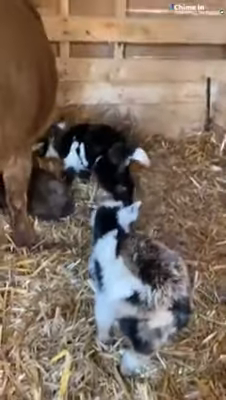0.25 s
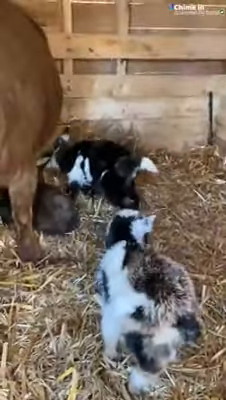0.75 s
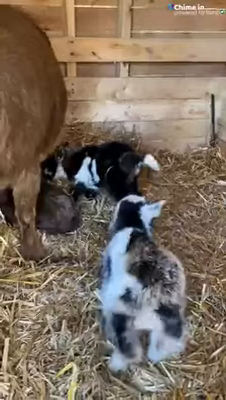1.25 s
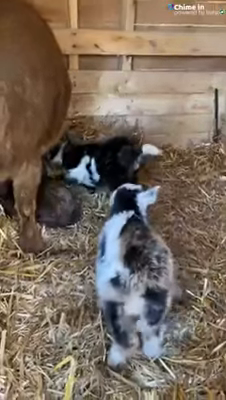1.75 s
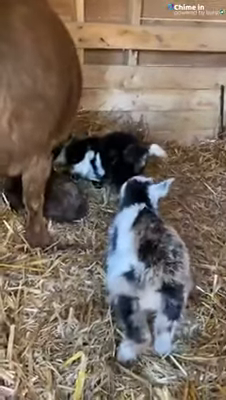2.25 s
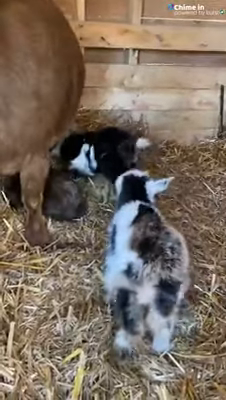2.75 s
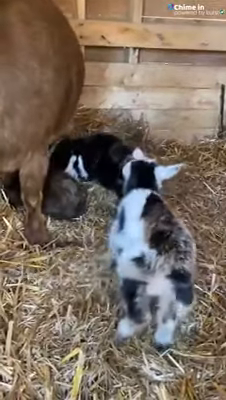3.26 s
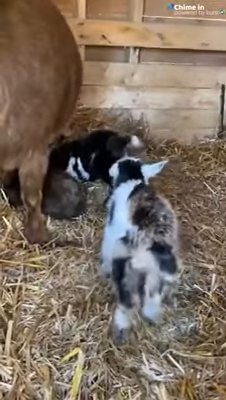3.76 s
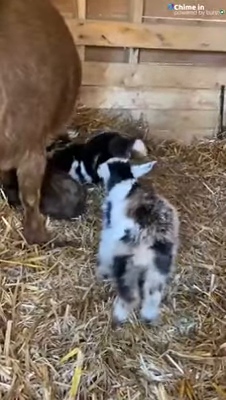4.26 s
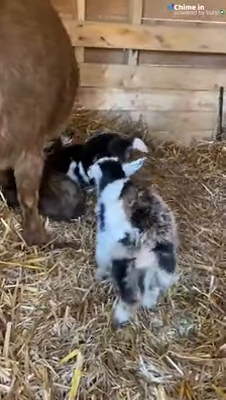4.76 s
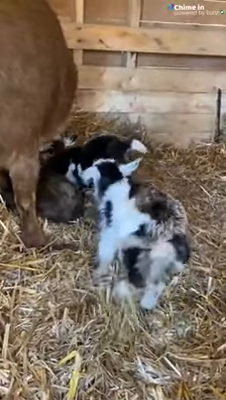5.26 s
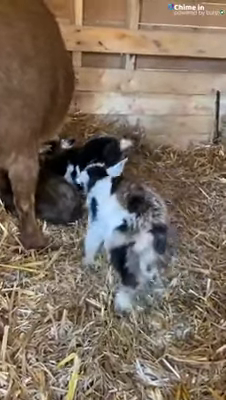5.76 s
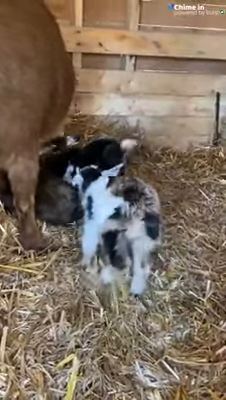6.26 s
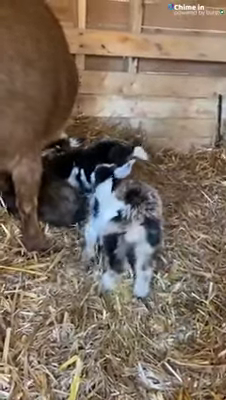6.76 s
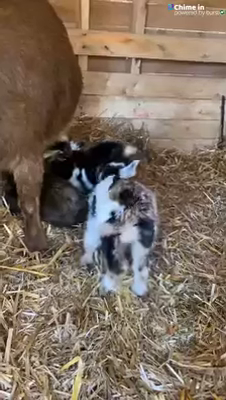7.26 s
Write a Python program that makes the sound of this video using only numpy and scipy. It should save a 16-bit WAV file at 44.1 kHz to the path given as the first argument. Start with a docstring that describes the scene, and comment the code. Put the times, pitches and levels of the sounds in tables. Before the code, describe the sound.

A young goat bleats six times, close by, in a small wooden pen. The first cry is loudest and longest, sagging into a rasp and followed by airy nose puffs; five shorter, quieter, quavering bleats follow about every second. Straw rustles and snaps as the animals shift, with a couple of dull low thumps. A low motor hum runs steadily underneath. Close stereo pickup, short dry plank reflections.

```python
"""Goat kid bleating in a straw pen

A goat kid bleats six times in a straw-bedded wooden pen, over a low machine hum built from sine partials.
Each bleat is a stack of harmonics and breath shaped by throat resonances: it scoops up in pitch, quavers
and frays into a rasp, and one sharp resonance makes it shrill. Noise swells make a goat's nose puffs, hoof
falls, low thumps and the bleats' last sighs; hiss, random cracks and bright bursts make the moving straw."""
import sys
import numpy as np
from scipy import signal
from scipy.io import wavfile

SR = 44100
rng = np.random.default_rng(int(sys.argv[2]) if len(sys.argv) > 2 else 0)


def wav_out(sig):
    """Save sig, one row per channel (or a flat mono array), as 16-bit PCM at SR to the path in sys.argv[1]."""
    wavfile.write(sys.argv[1], SR, np.round(np.clip(np.atleast_2d(sig).T, -1, 1) * 32767).astype(np.int16))


N = 330750

# The bleats. Each row: start in seconds, end in seconds, held pitch in Hz, scoop depth (0-1), scoop time in
# seconds, pitch sag by the end (0-1), level in dB before the voice trim, attack in seconds, fade by the end
# in dB, relative treble in dB, onset roughness (0-1), held roughness (0-1), throat tuning factor,
# first harmonic in dB, second harmonic in dB, fourth harmonic and up in dB.
BLEAT_ROWS = [(.6, 1.303, 831, .28, 0.048, 0.29, -16.5, 0.049, 16.5, -8.5, 0.65, 0, 1.037, -3, -3, -4),
              (2.463, 2.802, 745.7, 0.35, 0.05, 0.05, -20.5, 0.057, 3.5, -10.5, 0.02, 0.4, 1.037, -0.5, -2.5, -2.5),
              (3.813, 4.265, 812, 0.23, 0.039, .068, -25.5, 0.028, 1, -8, 0.14, 0, 1.095, 4, -4, -2),
              (5.033, 5.39, 783.8, 0.26, 0.043, .045, -21.5, 0.03, 6.7, -7.5, 0.63, 0.14, 1.085, -3.5, -14.5, -7.5),
              (6.113, 6.533, 797.5, .35, .045, 0.08, -21.5, 0.051, 3, -6, 0.86, 0.1, 1.019, 3, -4, -1.5),
              (7.053, 7.366, 765, 0.23, 0.032, 0.04, -25, 0.03, -6.5, -10, 0.25, 0.06, 1, -2, -6, -2.5)]
# Resonances of the open mouth that colour breath. Each row: centre in Hz, width in Hz, relative level in dB.
MOUTH_RESONANCES = [(2364, 170, 6.5), (3115, 850, 1), (3600, 390, 2.5), (5470, 1800, -10)]
MURMUR_S = .022  # faint lead-in from the closed mouth, ahead of each bleat


def from_db(db):
    """Decibels to gain."""
    return 10 ** (np.asarray(db) / 20)


def rms_one(x):
    """Scale to unit rms."""
    return x / np.sqrt(np.mean(x ** 2) + 1e-20)


def at_hz(points, hz):
    """Read a curve of (Hz, value) points on a log-frequency axis."""
    points = np.array(points)
    return np.interp(np.log(hz), np.log(points[:, 0]), points[:, 1])


def bell(offset_s, half_s):
    """A smooth hump of height 1 around zero."""
    return np.exp(-(offset_s / half_s) ** 2)


def band(x, low_hz, high_hz):
    """Butterworth band-pass."""
    sos = signal.butter(2, [low_hz, min(high_hz, .45 * SR)], "band", fs=SR, output="sos")
    return signal.sosfilt(sos, x)


def drift(rate_hz, size):
    """Smooth random wander of rms about 1: low-passed noise made at a sixteenth of the sample rate."""
    pole = np.exp(-32 * np.pi * rate_hz / SR)
    noise = rng.standard_normal(size // 16 + 4002)
    slow = signal.lfilter([1], [1, -2 * pole, pole * pole], noise)[4000:]  # drop the filter's settling
    return np.interp(np.arange(size) / 16, np.arange(len(slow)), rms_one(slow))


def resonance_gain(modes, hz):
    """Gain of a set of steep-sided resonances at a frequency."""
    gains = [from_db(db) / (1 + (2 * (hz - centre) / width) ** 2) for centre, width, db in modes]
    return np.sqrt(sum(gain ** 2 for gain in gains))


def through(modes, x):
    """Pass a sound twice through each resonance and sum them; rms 1."""
    out = 0
    for centre, width, db in modes:
        b, a = signal.iirpeak(centre, centre / width, fs=SR)
        once = signal.lfilter(b, a, x)
        out = out + from_db(db) * signal.lfilter(b, a, once)
    return rms_one(out)


def banded_noise(spectrum):
    """Stereo noise in 18 bands that follow a spectrum, more alike left and right in the bass; rms 1."""
    # Left-right likeness of diffuse sound. Each row: frequency in Hz, likeness (0-1).
    likeness = [(150, 1), (300, 0.86), (1000, 0.64), (3000, 0.6), (10000, 0.2)]
    edges = np.geomspace(max(spectrum[0][0], 18), spectrum[-1][0], num=19)
    white = rng.standard_normal((2, 2, N))
    out = 0
    for k, (low, high) in enumerate(zip(edges, edges[1:])):
        mid, side = band(white[k % 2], low, high)
        hz = np.sqrt(low * high)
        alike = np.clip(at_hz(likeness, hz), 0, .996)
        stereo = np.sqrt(1 + alike) * mid + np.sqrt(1 - alike) * side * [[1], [-1]]
        out = out + from_db(at_hz(spectrum, hz)) * stereo
    return rms_one(out)


def swells(rows):
    """Envelope of events that rise smoothly and then die away, falling 60 dB in each t60."""
    t = np.arange(N) / SR
    total = 0
    for start, db, rise, t60 in rows:
        decay = from_db(db - 60 * np.maximum(t - start, 0) / t60)
        total = total + decay * bell(np.minimum(t - start, 0), rise)
    return total


def hum():
    """Each turn of a motor gives a soft throb: multiples of its rate, nearly in step, wavering in strength."""
    # Hum partials. Each row: multiple of the turning rate, level in dB before the hum trim.
    hum_partials = [(1, -72), (2, -59), (3, -62), (4, -57), (5, -51), (6, -62), (7, -63), (9, -73),
                    (12, -72.5)]
    motor_hz, trim_db, waver = 24.21, -.5, .22
    turns = motor_hz * np.arange(N) / SR + rng.random()
    total = 0
    for multiple, db in hum_partials:
        strength = from_db(db) * (1 + waver * drift(8, N))
        phase = 2 * np.pi * round(multiple) * turns + .5 * rng.standard_normal()
        total = total + strength * np.sin(phase)
    return from_db(trim_db) * np.sqrt(2) * total


def barn_air():
    """The air of the barn: a steady bed of bass-heavy diffuse noise."""
    # Colour of the air. Each row: frequency in Hz, relative level in dB.
    air_colour = [(25, -36), (45, -5), (68, 2), (100, -7.5), (135, -4.5), (175, -10), (210, -20),
                  (330, -16.5), (500, -21.5), (800, -26), (1150, -33.5), (1700, -26.5), (3000, -32),
                  (5000, -51.5)]
    return from_db(-51.5) * banded_noise(air_colour)


def shuffling():
    """Strength of the rustle: each shuffle swells, holds and stops over the resting straw."""
    # Animals shuffle in the bedding. Each row: middle in seconds, half length in seconds, level in dB.
    shuffle_rows = [(0.113, 0.13, -63.5), (0.534, 0.034, -54.5), (1.42, 0.22, -57.5), (2.027, 0.043, -61),
                    (3.02, 0.28, -53.5), (3.67, 0.36, -58), (4.96, 0.2, -62.5), (5.411, 0.056, -55),
                    (5.706, 0.047, -60), (6.005, 0.22, -55.5), (6.91, 0.12, -58)]
    edge_steepness, resting_db = 7.5, -66  # resting: the rustle that never quite dies
    t = np.arange(N) / SR
    power = from_db(resting_db) ** 2
    for middle, half_s, db in shuffle_rows:
        power = power + from_db(db) ** 2 * np.exp(-np.abs((t - middle) / half_s) ** edge_steepness)
    return np.sqrt(power)


def straw():
    """Stalks rub in a soft hiss with tiny cracks scattered through it."""
    # Colour of the rustle. Each row: frequency in Hz, relative level in dB.
    straw_colour = [(1000, -6.5), (1600, -2.5), (2700, -1), (5000, -2), (7500, -3.5), (12000, -4),
                    (15000, -11.5)]
    crackle_db, cracks_per_s = -10, 250  # level against the hiss; rate on each side
    struck = rng.random((2, N)) < cracks_per_s / SR
    cracks = struck * from_db(4 * np.minimum(rng.exponential(1, (2, N)), 4))
    cracks = cracks + .5 * cracks[::-1]  # each side leaks into the other
    cracks = rms_one(band(cracks, 2800, 17000))
    return shuffling() * (banded_noise(straw_colour) + from_db(crackle_db) * cracks)


def snaps():
    """Straw snapping under hooves: a breaking stalk gives a brief bright burst."""
    # Snaps. Each row: time in seconds, level in dB before the snap trim.
    snap_rows = [(0.5013, -47), (2.995, -40), (3.4865, -48), (4.6604, -48.5), (5.487, -47), (5.848, -38),
                 (7.456, -49)]
    trim_db, rise_s, t60_s = -7.5, .0026, .073
    bursts = swells([(start, db, rise_s, t60_s) for start, db in snap_rows])
    return from_db(trim_db) * bursts * rms_one(band(rng.standard_normal(N), 1300, 14400))


def effort(t, start, end, held_hz, scoop_depth, scoop_s, sag, held_db, attack_s, fade_db, treble_db,
           crack, held_rough):
    """Course of one bleat: murmur, scoop up, hold, quaver, sag and fray, as pitch, level, treble, roughness."""
    # Quavers, brief pushes (+) and catches (-) of effort. Each row: middle in seconds, half length in seconds,
    # then the changes of pitch in Hz, level in dB, treble in dB and roughness.
    quaver_rows = [(0.696, 0.016, 0, -6, 6, 0.2), (0.731, 0.021, 12.5, 6, 0.5, -0.033),
                   (0.791, .023, -14.5, -0.5, -1.5, -0.16), (0.896, 0.015, 14, 5.5, 0.5, -0.17),
                   (1.089, 0.12, 27, -3.5, -4, 0.073), (1.001, 0.011, -3.5, -6.5, 4, -0.061),
                   (1.14, .03, -7, 3, -3, 0.37), (1.215, 0.029, -61.5, -6, 0, -0.22),
                   (1.251, 0.02, -5.5, 7.5, -2.5, -0.67), (2.518, 0.014, 5.5, 5, 1.5, 0.08),
                   (2.579, 0.039, -110, -17, 6, 0.41), (2.627, 0.016, 5.5, 3, -2.5, -0.21),
                   (2.686, 0.034, -76.5, -19.5, 3, 0.23), (2.737, 0.0144, 8, 4, -2, -0.18),
                   (3.903, 0.059, -34, -12, -2, -0.26), (3.964, 0.017, -15.5, 2, -9.5, 0.052),
                   (3.991, .018, 16, 2, 7, -0.0049), (4.079, 0.02, 7.5, 2, 6, .15),
                   (4.112, .015, 0, 1.5, -3.5, .3), (4.144, 0.022, -79, -10.5, 1, -0.18),
                   (4.174, 0.035, -19.5, 7, 0, 0.013), (5.119, 0.0113, 27.5, -10.5, 4.5, 0.28),
                   (5.166, .012, -17, 1, 3.5, 0.026), (5.187, .015, 18, 13, -7, -0.078),
                   (5.25, .032, -76.5, -22.5, 7.5, 0.14), (5.313, 0.026, 5, 11, -3.5, 0.0091),
                   (6.274, 0.024, 28.5, 8.5, -7.5, -0.45), (6.316, 0.019, -4.5, 1.5, -5, -0.23),
                   (6.368, 0.019, 19.5, 6, -9.5, -0.28), (6.427, 0.026, -54, -9, -3.5, -0.45),
                   (6.482, 0.026, 6.5, 7, -6.5, -0.12), (7.13, 0.011, 6, -11.5, 5.5, -0.048),
                   (7.202, 0.024, 39, 13.5, -5.5, -0.14), (7.232, 0.029, -17.5, -15, 3, 0),
                   (7.302, 0.0095, 12.5, 6, -4, -0.24)]
    age, left = np.maximum(t - start, 0), end - t
    early = np.maximum(start - t, 0) / MURMUR_S
    spent = age / (end - start)

    # it starts under its pitch and eases up, holds, gives way late, and its last trace droops
    scoop = 1 - scoop_depth * np.exp(-(age / scoop_s) ** 1.5)
    droop = 1 - .3 * bell(left, .019)
    pitch = held_hz * scoop * (1 - sag * spent ** 4) * droop

    # the folds catch with a small burst and rattle for a moment
    catching = bell(age - .053, .028)
    attack_db = 1 * catching - 35 * np.exp(-(age / attack_s) ** 1.67)
    murmur_db = -11.5 * early
    release_db = -29.5 * bell(left, .043)  # the voice dies at the end
    level_db = held_db + attack_db + murmur_db - fade_db * spent ** 2 + release_db

    bright_db = treble_db - 10.5 * bell(age, .018)  # the treble joins as the mouth opens
    fray = 1.07 * np.exp(-left / .068)  # the folds fray again as the air runs out
    rough = held_rough + crack * catching + fray

    course = np.array([pitch, level_db, bright_db, rough])
    for middle, half_s, *changes in quaver_rows:
        course = course + np.outer(changes, bell(t - middle, half_s))
    pitch, level_db, bright_db, rough = course
    # above this knee a surge feeds mostly the main resonance; the treble misses a share of it
    knee_db, missed_share = -22.5, .41
    bright_db = bright_db - missed_share * np.maximum(level_db - knee_db, 0)
    return pitch, level_db, bright_db, rough


def bleat(row):
    """Vocal folds drive the throat; roughness shakes their period and lets air rush through each cycle."""
    # Throat and mouth, then the treble resonances above them. Each row: centre in Hz before the bleat's
    # tuning factor, width in Hz before that factor, relative level in dB. The breath takes the treble ones untuned.
    throat_modes = [(767, 1400, -14), (1520, 360, -10), (2324, 790, 1), (3154, 53, -6), (3672, 190, -10.5)]
    treble_modes = [(4953, 130, -3), (5470, 940, -2), (6304, 130, -1), (7920, 1770, -11.5),
                    (9260, 210, -12.5), (10820, 670, -18.5), (12200, 470, -28.5)]
    # The nasal passages swallow two bands. Each row: centre in Hz, width in Hz.
    nasal_hollows = [(4330, 430), (7300, 1260)]
    start, end, *course, tuning, first_db, second_db, open_db = row
    t = np.arange(int((start - MURMUR_S) * SR), int(end * SR)) / SR
    size = len(t)
    pitch, level_db, bright_db, rough = effort(t, start, end, *course)
    rough = np.clip(rough, 0, 1)

    # fast jitter and slower wobble come with roughness; a slight quiver is always there
    shake = rough * (.022 * drift(240, size) + .016 * drift(100, size))
    pitch = pitch * (1 + shake + .0024 * drift(44, size))
    phase = 2 * np.pi * np.cumsum(pitch) / SR
    order = np.arange(1, 21)[:, None]
    hz = order * pitch
    waves = np.sqrt(2) * np.sin(order * phase + rng.uniform(0, 2 * np.pi, order.shape))

    # each harmonic flutters on its own, the more so in a rough voice
    wander = np.array([drift(35, size) for _ in order])
    flutter = from_db(2 * (1 + rough) * wander)
    low = resonance_gain(throat_modes, hz / tuning) * flutter * from_db(open_db * (order > 3))
    high = resonance_gain(treble_modes, hz / tuning) * flutter
    low, high = [gain / np.sqrt((gain ** 2).sum(axis=0)) for gain in (low, high)]

    # a soft, smooth voice is rounder: its two lowest harmonics fade less than the rest
    softness_db = np.minimum(-33.5 - level_db, 19.5)
    rounding_db = .83 * softness_db * (1 - rough / 2) * (order <= 2) / np.sqrt(order)
    low = low * from_db(rounding_db)
    low = low * from_db(first_db * (order == 1) + second_db * (order == 2))

    # breath pulses with the folds: rasp through the mouth, hiss through the upper throat
    breath = rng.standard_normal(size) * (1 + .8 * np.cos(phase))
    rasp = from_db(-8) * rough ** 2 * through(MOUTH_RESONANCES, breath)
    hiss = rough ** 2 * through(treble_modes, breath)
    body = (low * waves).sum(axis=0) + rasp
    edge = (high * waves).sum(axis=0) + hiss
    voice = body + from_db(bright_db + 2.5) * edge

    shimmer = 1 + .28 * rough * drift(72.6, size)
    tremor_db = 1.04 * drift(40, size)
    voice = voice * shimmer * from_db(level_db + tremor_db) * signal.windows.tukey(size, .04)
    for centre, width in nasal_hollows:
        b, a = signal.iirnotch(centre, centre / width, fs=SR)
        voice = signal.lfilter(b, a, voice)
    return np.pad(voice, (round(t[0] * SR), N))[:N]


def sighs():
    """The last air of each bleat leaves the open mouth as noise while the voice dies."""
    before_end_s, level_db, rise_s, t60_s = .012, -43.5, .089, .12
    rows = [(end - before_end_s, level_db, rise_s, t60_s) for start, end, *rest in BLEAT_ROWS]
    return swells(rows) * through(MOUTH_RESONANCES, rng.standard_normal(N))


def puffs():
    """Puffs of air from a goat's nose: swells of coloured noise."""
    # Puffs. Each row: time in seconds, level in dB, rise in seconds, t60 in seconds.
    puff_rows = [(1.28, -38, 0.028, 0.51), (1.533, -37.5, 0.009, 0.41), (1.66, -57, 0.033, 0.82),
                 (3.72, -53, 0.04, 0.5)]
    # Colour of the puffs. Each row: frequency in Hz, relative level in dB.
    puff_colour = [(1200, -13), (2300, 0.5), (4200, 3.5), (5000, 7), (6300, 3), (7300, -43), (8500, 0),
                   (10000, -5), (14000, -13)]
    return swells(puff_rows) * banded_noise(puff_colour)


def steps():
    """Dull hoof falls and scuffs in the bedding: short swells of muffled noise."""
    # Steps. Each row: time in seconds, level in dB, rise in seconds, t60 in seconds.
    step_rows = [(2.225, -54.5, 0.017, 0.15), (2.605, -44.5, 0.037, 0.36), (6.68, -54.5, 0.0072, 0.11)]
    # Colour of the steps. Each row: frequency in Hz, relative level in dB.
    step_colour = [(100, -22), (260, 12), (420, 0), (900, -2), (1400, -6), (3000, -30)]
    return swells(step_rows) * banded_noise(step_colour)


def thumps():
    """Low thumps, felt through the floor: brief swells of deep rumble, alike on both sides."""
    # Thumps. Each row: time in seconds, level in dB, rise in seconds, t60 in seconds.
    thump_rows = [(2.61, -43.5, 0.034, 0.84), (4.65, -42, 0.02, 0.6)]
    # Band of the rumble: low edge in Hz, high edge in Hz.
    thump_band = (46, 95)
    return swells(thump_rows) * rms_one(band(rng.standard_normal(N), *thump_band))


def echoes(x, t60_s):
    """Dense reflections that die away, different on each side."""
    t = np.arange(int(.4 * SR)) / SR
    tail = rng.standard_normal((2, len(t))) * from_db(-60 * t / t60_s) * (t > .001)
    tail = tail / np.sqrt((tail ** 2).sum(axis=1, keepdims=True))
    return signal.fftconvolve(x[None], tail, axes=1)[:, :N]


def pen(x):
    """Near planks answer at once, straw swallows most of the tail; beamed treble comes back more strongly."""
    sent = band(x, 400, 15000) + .8 * band(x, 4200, 15000)
    planks = from_db(-12.5) * echoes(sent, .09)
    tail = from_db(-23) * echoes(sent, .37)
    return x + planks + tail


def scene():
    """The kid close by, the small noises of the pen and the hum behind."""
    background = hum() + barn_air()
    rustle = straw()
    voice_trim_db = -2.1
    kid = from_db(voice_trim_db) * sum(bleat(row) for row in BLEAT_ROWS)
    in_pen = pen(snaps() + kid + sighs())
    return background + rustle + in_pen + puffs() + steps() + thumps()


def record(dry):
    """The microphone has a dip in the treble, and the top is cut."""
    dip_hz, dip_width_hz, dip_depth, cutoff_hz = 7400, 1100, .44, 15000
    b, a = signal.iirpeak(dip_hz, dip_hz / dip_width_hz, fs=SR)
    coloured = dry - dip_depth * signal.lfilter(b, a, dry)
    top_cut = signal.ellip(10, .3, 80, cutoff_hz, fs=SR, output="sos")
    return signal.sosfilt(top_cut, coloured)


dry = scene()
out = record(dry)
wav_out(out)
```